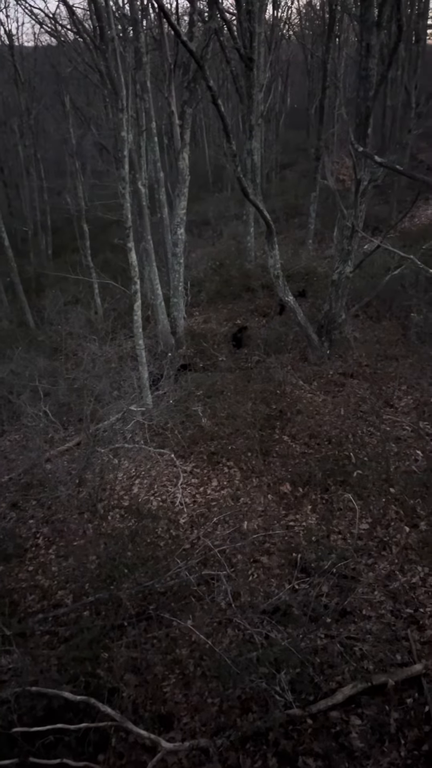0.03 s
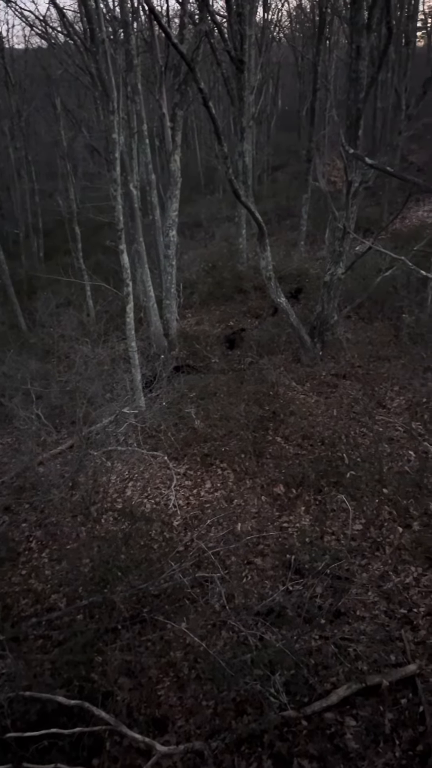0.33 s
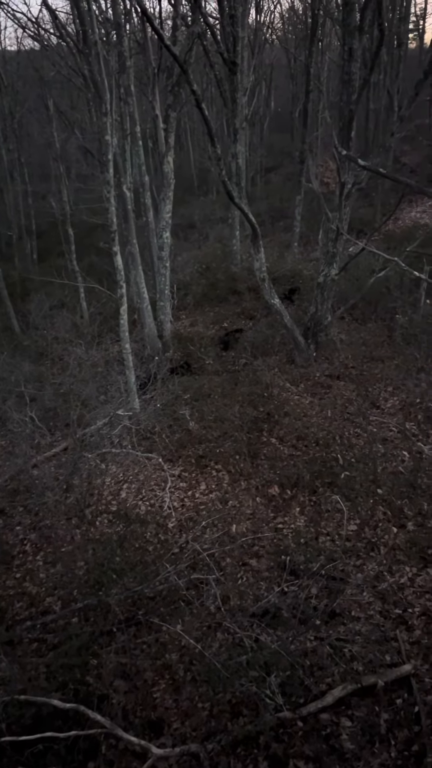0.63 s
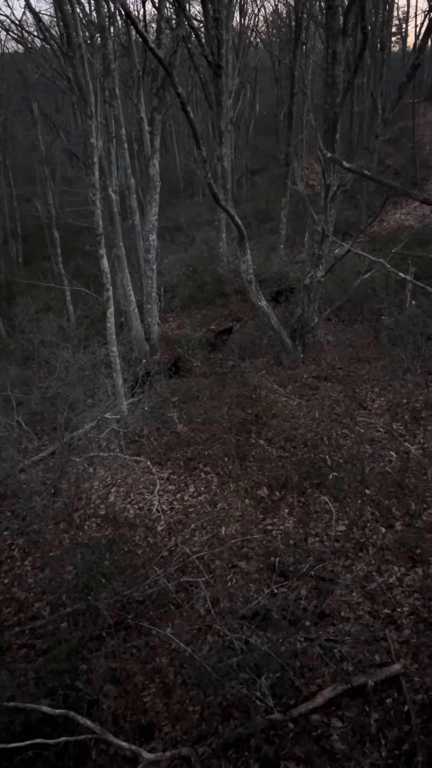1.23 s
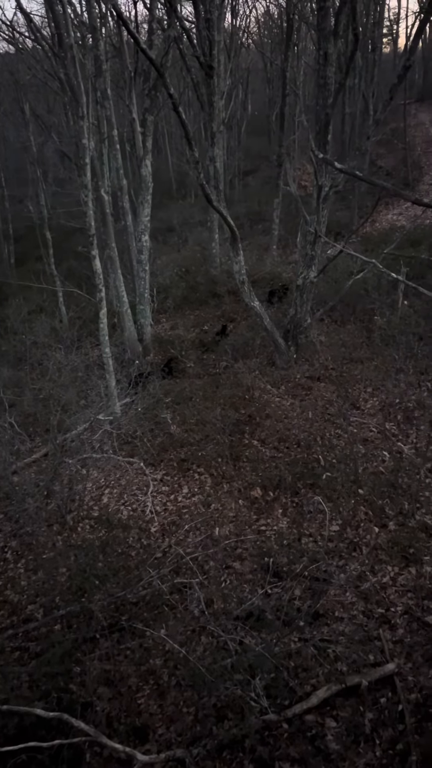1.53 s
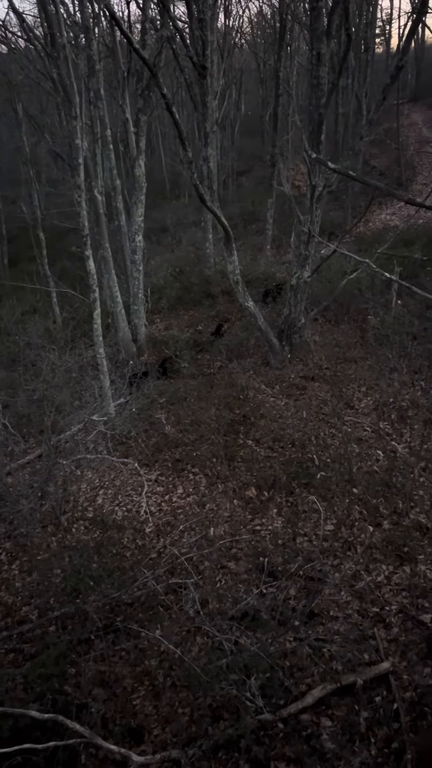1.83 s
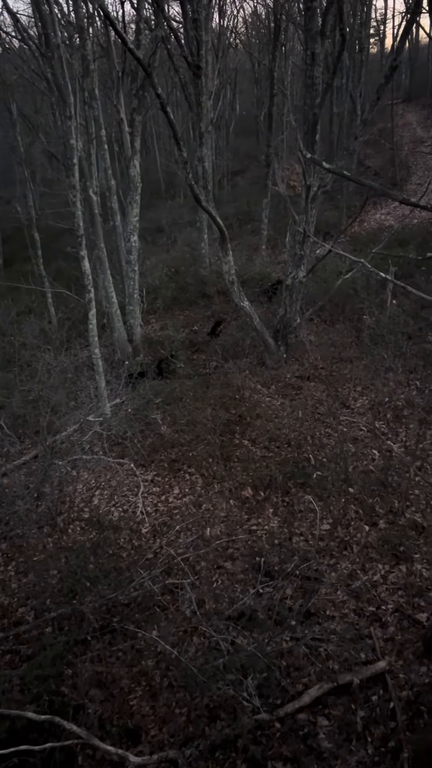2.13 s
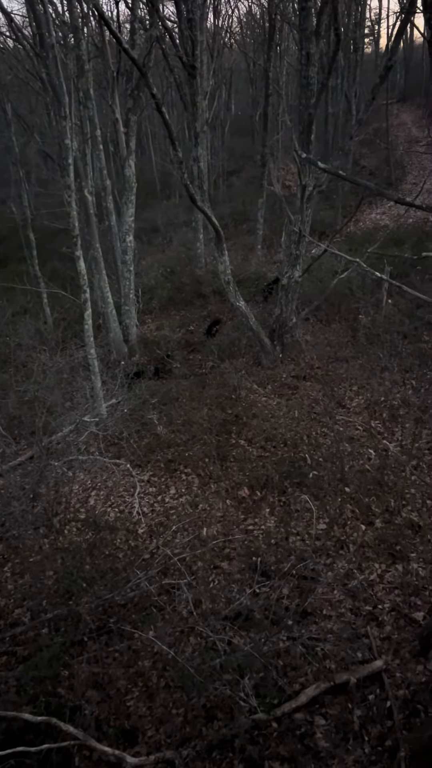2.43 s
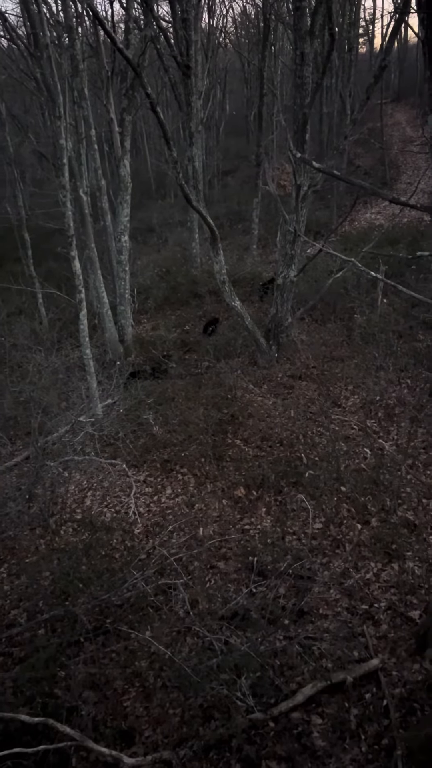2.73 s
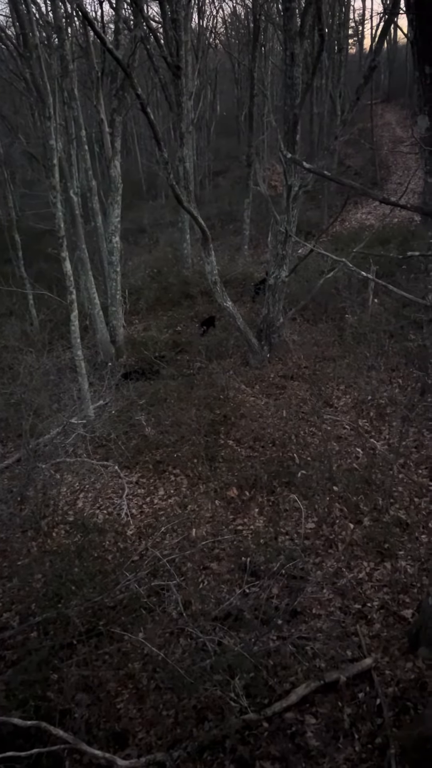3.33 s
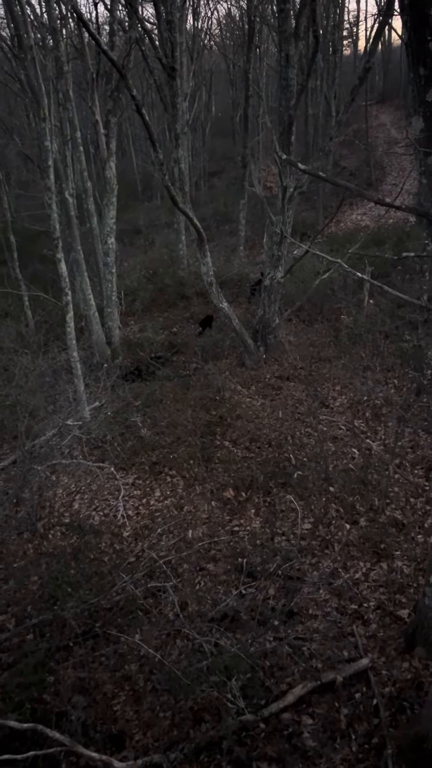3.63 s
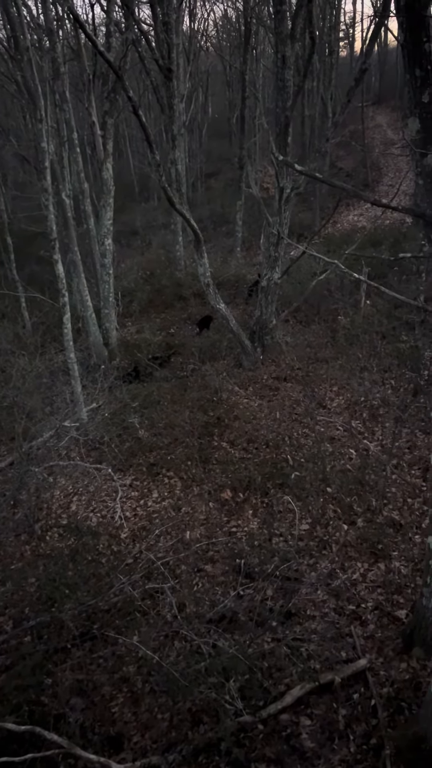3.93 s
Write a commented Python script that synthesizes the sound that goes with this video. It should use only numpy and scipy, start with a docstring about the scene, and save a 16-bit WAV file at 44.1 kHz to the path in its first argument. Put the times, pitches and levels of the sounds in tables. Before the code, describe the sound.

A soft, crackling rustle of dry leaves rises and falls near the microphone, over low, fluttering wind rumble. Faint twig snaps and leaf crunches come now and then, with distant forest trees hushing underneath.

```python
"""A bare wood in light wind. Close by, dry leaves rustle in uneven swells, their countless contacts
adding up to a crackling hiss; leaves scuff, litter crunches and a few twigs snap faintly, each snap
an impulse that excites a broad resonance. Turbulent air rumbles, bumps and flutters on the
microphone, one low whirr passes as a quick train of pulses, and far trees hush underneath."""
import sys
import numpy as np
from scipy import signal
from scipy.fft import rfft, irfft
from scipy.io import wavfile
from scipy.ndimage import uniform_filter1d

SR = 44100
rng = np.random.default_rng(int(sys.argv[2]) if len(sys.argv) > 2 else 0)


def log_audio(samples):
    """Write samples as a 16-bit WAV file to the path given in sys.argv[1]."""
    # one column per channel
    frames = np.atleast_2d(samples).T
    # limit to full scale, then quantise
    limited = np.clip(frames, -1, 1)
    pcm = np.round(limited * 32767).astype(np.int16)
    wavfile.write(sys.argv[1], SR, pcm)


N = 176400

# The rustle as heard, its treble cut above 12 kHz. Each row: frequency in Hz, relative level in dB.
RUSTLE_SPECTRUM = [(240, -43), (400, -28), (481, -9), (532, -20), (649, -11), (876, -12), (968, -5.5),
                   (1550, -7.5), (1840, -0.5), (2150, -3.5), (2980, -5.5), (3300, -11.5), (3640, -4),
                   (3910, -12), (4200, -2.5), (4510, -11.5), (4980, -12.5), (5580, -5), (6260, -3.5),
                   (8930, -13), (10400, -13.5), (11200, -19), (12000, -39.5), (15700, -41), (22000, -120)]


def from_db(db):
    """Amplitude grows tenfold with every 20 dB."""
    return 10 ** (np.asarray(db) / 20)


def unit_rms(x):
    """Dividing by the root mean square gives unit power."""
    return x / np.sqrt(np.mean(x ** 2) + 1e-20)


def unit_mid(pair):
    """Scales a stereo pair so that its mid, the mean of both channels, has unit variance."""
    return pair / np.std(pair.mean(0))


def seconds():
    """Uniform sampling: the time of every sample."""
    return np.arange(N) / SR


def swell(centre, half_length):
    """A Gaussian envelope, down to 1/e at half_length seconds either side of its centre."""
    return np.exp(-((seconds() - centre) / half_length) ** 2)


def in_time(points):
    """Linear interpolation of (seconds, value) points at every sample."""
    return np.interp(seconds(), *np.transpose(points))


def gains(points):
    """A magnitude response: (Hz, dB) points joined along a logarithmic frequency axis."""
    hz, db = np.transpose(points)
    return from_db(np.interp(np.log(np.arange(N // 2 + 1) * SR / N + 1), np.log(hz), db))


def drift(corner_hz):
    """Low-pass filtered noise wanders slowly, with a spread of about 1."""
    hop, settle = 40, 2000  # samples per step, steps for the filter to settle
    pole = np.exp(-2 * np.pi * corner_hz * hop / SR)
    white = rng.standard_normal(N // hop + settle + 2)
    slow = signal.lfilter([1], [1, -2 * pole, pole * pole], white)[settle:]
    return np.interp(np.arange(N) / hop, np.arange(len(slow)), unit_rms(slow))


def stereo(pair, spectrum):
    """Mid-side stereo: two signals are filtered, and their sum and difference form the channels."""
    # Stereo image as heard: nearly mono at 5.7-7.4 kHz, almost all side above 12 kHz.
    # Each row: frequency in Hz, side relative to mid in dB.
    side_level = [(40, -23), (70, -14), (120, -8), (180, -5), (400, 0), (750, 2), (1000, -7), (1450, -10),
                  (1800, -17), (2250, -10), (2700, -5), (3300, -3), (3550, -8), (3850, 0), (4200, -11),
                  (4550, 3), (5050, 3), (5450, -11), (5750, -28), (7400, -28), (7800, -12), (10000, -3),
                  (11500, 5), (12300, 6), (15500, 13)]
    # Balance. Each row: frequency in Hz, left relative to right in dB.
    left_level = [(100, 0.5), (220, -3), (400, 0), (900, 1.5), (1800, -1.5), (2600, 6), (3400, 5),
                  (4200, 1), (4700, 9), (5500, 0)]
    # Phase between the channels. Each row: frequency in Hz, lead of the left in radians.
    left_phase = [(100, 0), (240, .55), (480, 0), (690, .7), (950, -.2), (1500, -.2), (2150, .4),
                  (2900, -.5), (3650, -.2), (3950, -1.0), (4300, -.7), (4750, -1.6), (5150, 1.0), (5700, 0),
                  (7500, 0), (10000, -1.3), (11300, -2.0), (11800, -2.7), (12200, -2.95)]
    mid, side = rfft(pair) * gains(spectrum)
    lean = gains(left_level)
    lead = np.interp(np.arange(N // 2 + 1) * SR / N, *np.transpose(left_phase))
    mid_to_side = (lean - 1) / (lean + 1) + 1j * np.tan(np.clip(lead, -3, 3) / 2)
    side = side * gains(side_level) + mid * mid_to_side
    return irfft(np.array([mid + side, mid - side]), N)


def noise(spectrum):
    """White noise takes on the spectrum of the filter it passes through."""
    return unit_mid(stereo(rng.standard_normal((2, N)), spectrum))


def resonate(force, hz, q):
    """A damped resonator passes a band about hz / q wide."""
    return signal.lfilter(*signal.iirpeak(hz, q, fs=SR), force)


def far_trees(level_db=-71.5, waver_db=1.2):
    """Incoherent sound from distant trees sums to a smooth hush that wavers slightly."""
    # The hush as heard. Each row: frequency in Hz, relative level in dB.
    spectrum = [(100, 1.5), (220, -3.5), (400, -16.5), (560, -18), (780, -11.5), (970, -4.5), (1200, -23.5),
                (1500, -18), (1900, -12.5), (2400, -11), (2900, -36.5), (4200, -32.5), (10000, -36),
                (12500, -64)]
    return from_db(level_db + waver_db * drift(corner_hz=5.2)) * noise(spectrum)


def wind_rumble(gain_db=1.5, compression=0.27):
    """Turbulent pressure on the microphone makes low noise that follows the strength of the wind."""
    # Strength of the wind. Each row: time in seconds, relative level in dB.
    strength = [(0, -61), (0.15, -63), (0.2, -51.5), (0.3, -57.5), (0.53, -60), (0.6, -51), (0.72, -54),
                (0.92, -61), (1.08, -56.5), (1.16, -48), (1.28, -51), (1.36, -58), (1.41, -51.5),
                (1.6, -54.5), (1.81, -49.5), (1.89, -65.5), (2.02, -57), (2.13, -49), (2.25, -53),
                (2.38, -48), (2.45, -64), (2.51, -50.5), (2.63, -50.5), (2.71, -60), (2.755, -52),
                (2.9, -55.5), (3.0, -58), (3.11, -53), (3.2, -60), (3.32, -56), (3.41, -60.5), (3.46, -53),
                (3.52, -66.5), (3.57, -55.5), (3.7, -62), (4.0, -55.5)]
    # Spectrum of the rumble. Each row: frequency in Hz, relative level in dB.
    spectrum = [(15, -50), (25, -20), (38, -3), (52, 3.5), (68, 2.5), (85, -7), (120, -15.5), (160, -28.5),
                (220, -36), (400, -43), (700, -86), (1500, -120)]
    rumble = noise(spectrum)
    power = uniform_filter1d(np.abs(signal.hilbert(rumble.mean(0))) ** 2, size=2500) / 2
    evened = unit_rms(rumble / (power + 0.05) ** (compression / 2))  # softens chance surges
    return from_db(gain_db + in_time(strength)) * evened


def flutters():
    """Passing eddies modulate a band of noise that lies above the rumble."""
    # Eddies. Each row: centre in seconds, level in dB, half length in seconds.
    eddies = [(0.597, -67, 0.034), (1.128, -69, 0.022), (1.46, -69.5, 0.043), (1.713, -63.5, 0.065),
              (1.833, -68.5, 0.078), (2.192, -69, 0.024), (2.392, -61, 0.023), (3.753, -67, 0.067),
              (3.904, -66, 0.021)]
    # Spectrum of a flutter. Each row: frequency in Hz, relative level in dB.
    spectrum = [(60, -28), (120, 7.5), (200, 6), (260, 1.5), (330, -8.5), (500, -70), (1200, -100)]
    return sum(from_db(db) * swell(centre, half) for centre, db, half in eddies) * noise(spectrum)


def air_bumps():
    """Each bump of air is a pressure wave packet: a few low cycles under a Gaussian envelope."""
    # Each row: centre in seconds, envelope peak in dB, pitch in Hz, Gaussian sigma in seconds.
    packets = [(0.631, -45.5, 73.3, 0.044), (1.148, -39.5, 96, 0.0073), (1.194, -32.5, 61, 0.011),
               (1.326, -38, 76, 0.0095), (1.83, -41, 81, 0.012), (2.196, -33, 62, 0.0061),
               (2.332, -36, 64.7, 0.013), (2.389, -45, 70.5, .011), (2.849, -43, 62.7, 0.059),
               (3.38, -39.5, 55.6, 0.0071), (3.759, -41.5, 61, .013), (3.914, -32, 61.3, 0.0073)]
    t, out = seconds(), 0
    for centre, db, hz, sigma in packets:
        envelope = from_db(db) * swell(centre, np.sqrt(2) * sigma)
        out += envelope * np.cos(2 * np.pi * (hz * (t - centre) + rng.random()))
    return out


def whirr(centre_s=1.701, level_db=-48.5, beat_rate_hz=28, pitch_hz=198, beat_sigma_s=0.0038):
    """A nearly periodic train of soft tone pulses swells and fades, heard as a whirr like small wings."""
    beats = centre_s + (np.arange(-6, 7) + rng.normal(0, 0.02, 13)) / beat_rate_hz
    t, train = seconds(), 0
    for beat in beats:
        train += swell(beat, np.sqrt(2) * beat_sigma_s) * np.cos(2 * np.pi * pitch_hz * (t - beat))
    return from_db(level_db) * swell(centre_s, half_length=0.062) * train


def litter_crunches():
    """Leaf litter gives way in bursts of dull noise that start abruptly and decay exponentially."""
    # Each row: start in seconds, level in dB, decay time in seconds.
    bursts = [(0.169, -74.5, 0.066), (2.425, -63, 0.053), (3.579, -69, 0.08), (3.772, -74, 0.13)]
    # Spectrum of a crunch. Each row: frequency in Hz, relative level in dB.
    spectrum = [(150, -8), (300, -0.5), (500, -9), (750, -5), (1200, -13.5), (2500, -36), (8000, -73)]
    t, envelope = seconds(), 0
    for start, db, decay in bursts:
        envelope += from_db(db) * (t > start) * np.exp(-np.abs(t - start) / decay)
    return envelope * noise(spectrum)


def twig_snaps(decay_s=0.0012, tail_s=0.01, tail_db=-6.5, direct_db=-8, gain_db=-9):
    """Brittle fracture: a crack of a few milliseconds with a short tail excites one broad resonance."""
    # Each row: start in seconds, relative level in dB, resonance in Hz.
    snaps = [(0.101, -51, 7100), (0.2684, -52, 1770), (0.308, -46.5, 6500), (0.337, -51, 6000),
             (0.578, -61, 2450), (2.2984, -44, 6000), (2.4212, -37.5, 11500), (2.4317, -36.5, 6000),
             (2.4525, -47, 6450), (2.48, -49, 7500), (2.619, -52, 2160), (2.6602, -44.5, 5800),
             (2.815, -55, 1020), (2.852, -50, 6250), (2.9612, -51, 6500), (3.012, -54, 5500),
             (3.2226, -36.5, 11200), (3.801, -61.5, 500), (3.9669, -56, 6600)]
    # Tone of the snaps as heard, the treble cut above 12 kHz. Each row: frequency in Hz, gain in dB.
    heard_tone = [(150, -24), (400, -12), (800, 4.5), (3500, 2), (4800, -5), (6300, -1.5), (10500, -12),
                  (11500, -14), (12300, -36), (15500, -31)]
    out = np.zeros((2, N))
    for start, db, hz in snaps:
        age = np.maximum(seconds() - start, 0)
        envelope = (age > 0) * (np.exp(-age / decay_s) + from_db(tail_db) * np.exp(-age / tail_s))
        crack = envelope * rng.standard_normal((2, N)) + 1e-18
        ring = resonate(crack, hz, q=3) * np.sqrt(SR / hz)  # similar power at any bandwidth
        out += from_db(db + gain_db) * (ring + from_db(direct_db) * crack)
    return stereo(out, heard_tone)


def crackles(ticks_per_s=2000, spread_db=2):
    """Leaf edges tick as a Poisson process; each impulse rings briefly in one of 22 resonances."""
    out, pitches_hz = np.zeros((2, N)), np.geomspace(900, 11000, 22)
    for hz in pitches_hz:
        struck = rng.random(N) < ticks_per_s / len(pitches_hz) / SR
        sizes = from_db(spread_db * np.minimum(rng.exponential(1, N), 4))
        polarity = np.sign(rng.random((2, N)) - 0.5)
        out += resonate(struck * sizes * polarity + 1e-18, hz, q=7.5)
    return unit_mid(stereo(out, RUSTLE_SPECTRUM))


def leaf_scuffs():
    """Friction of one leaf dragging over another gives a grainy burst around one broad resonance."""
    # Each row: centre in seconds, level in dB, resonance in Hz, half length in seconds.
    scuffs = [(0.196, -64, 1470, 0.042), (0.2, -63, 9400, 0.05), (1.322, -66, 2300, .025),
              (1.961, -68.5, 3970, 0.011), (3.42, -61.5, 2230, 0.021)]
    grains, out = crackles(), 0
    for centre, db, hz, half in scuffs:
        out += from_db(db) * swell(centre, half) * unit_mid(resonate(grains, hz, q=1.6))
    return out


def leaf_rustle(hiss_db=-2.5, crackle_db=-6.5, flicker_db=1.46, crossover_hz=3500):
    """Countless soft contacts superpose into a crackling hiss; each swell has its own share of treble."""
    # Swells of the rustle. Each row: time in seconds, relative level in dB.
    swells = [(0, -67.5), (0.09, -70.5), (0.125, -64.5), (0.17, -57), (0.25, -57), (0.29, -63),
              (0.4, -65.5), (0.565, -67.5), (0.59, -62.5), (0.72, -66), (0.79, -70), (0.94, -67.5),
              (0.96, -63), (1.03, -64), (1.09, -71.5), (1.14, -65), (1.26, -64), (1.33, -61), (1.44, -66.5),
              (1.64, -66.5), (1.73, -70.5), (1.93, -69.5), (2.0, -71.5), (2.07, -75.5), (2.14, -73.5),
              (2.17, -70), (2.3, -64), (2.34, -64), (2.44, -60), (2.5, -61.5), (2.6, -61.5), (2.72, -68),
              (2.8, -68), (2.97, -66), (3.06, -69), (3.1, -61.5), (3.16, -66), (3.3, -64.5), (3.41, -62),
              (3.5, -64.5), (3.61, -59.5), (3.68, -66.5), (3.85, -66.5), (3.97, -57.5), (4.0, -60.5)]
    # Brightness, taken about its mean. Each row: time in seconds, treble against the rest in dB.
    brightness = [(0, -7), (.15, -5), (.32, -1.5), (.8, -3.5), (1.0, -4), (1.1, -6.5), (1.2, -1.5),
                  (1.55, 0.5), (1.8, -3.5), (2.1, -4.5), (2.35, -0.5), (2.6, -3), (3.1, -3), (3.42, -3.5),
                  (3.6, -3), (3.96, -0.5)]
    rustle = from_db(hiss_db) * noise(RUSTLE_SPECTRUM) + from_db(crackle_db) * crackles()
    treble = signal.sosfiltfilt(signal.butter(2, crossover_hz, "high", fs=SR, output="sos"), rustle)
    treble_db = in_time(brightness)
    tilt = from_db((treble_db - treble_db.mean()) / 2)  # half lifts the treble, half lowers the rest
    envelope = from_db(in_time(swells) + flicker_db * drift(corner_hz=22))
    return envelope * (treble * tilt + (rustle - treble) / tilt)


def scene():
    """Linear superposition: the pressures of all sources add."""
    nearby = leaf_rustle() + leaf_scuffs() + twig_snaps() + litter_crunches()
    return nearby + wind_rumble() + flutters() + air_bumps() + whirr() + far_trees()


def record(dry):
    """Band limiting: a steep low-pass filter removes the highest treble."""
    stop_hz, stop_db = 16300, 60
    return signal.sosfilt(signal.cheby2(14, stop_db, stop_hz, fs=SR, output="sos"), dry)


dry = scene()
out = record(dry)
log_audio(out)
```